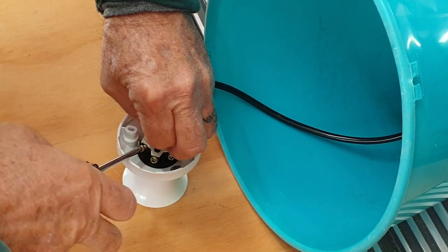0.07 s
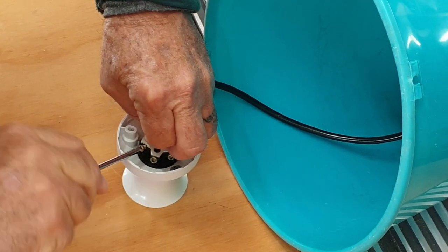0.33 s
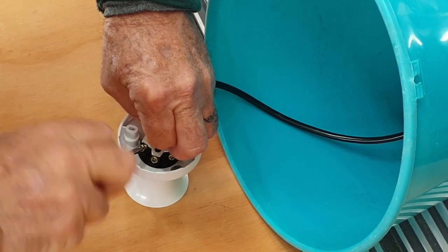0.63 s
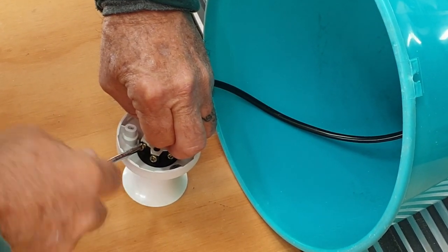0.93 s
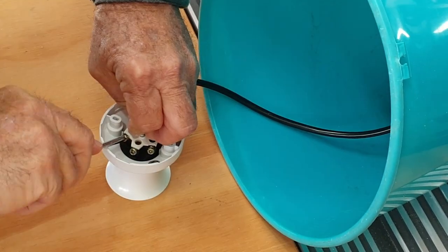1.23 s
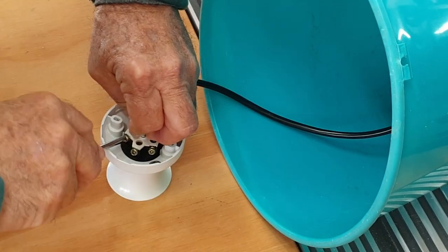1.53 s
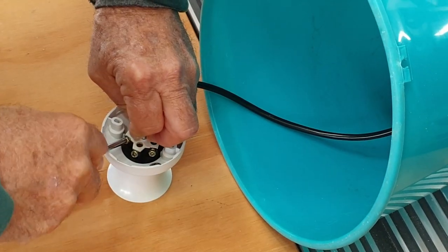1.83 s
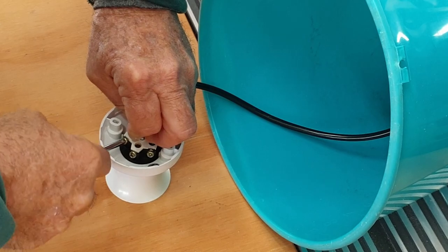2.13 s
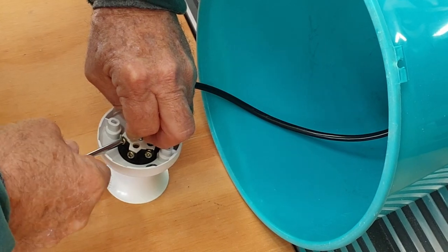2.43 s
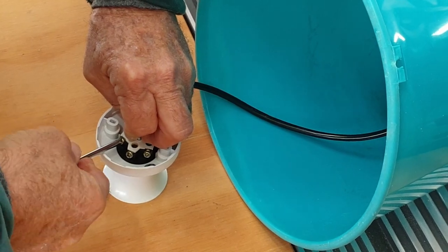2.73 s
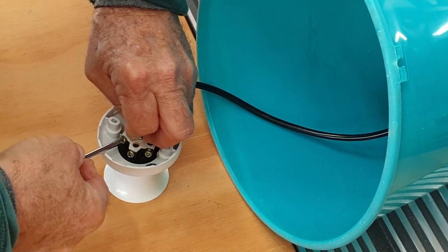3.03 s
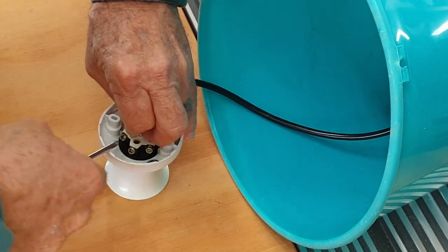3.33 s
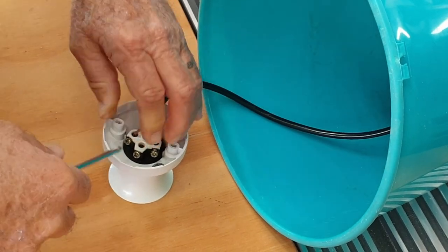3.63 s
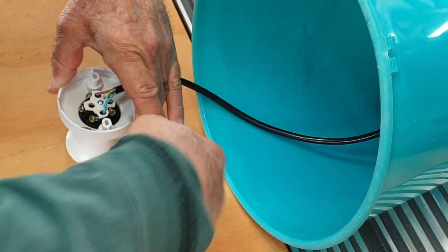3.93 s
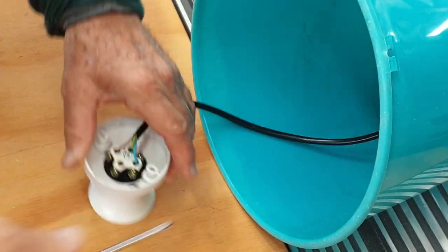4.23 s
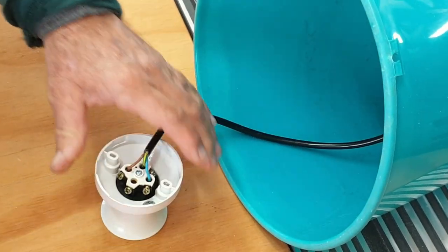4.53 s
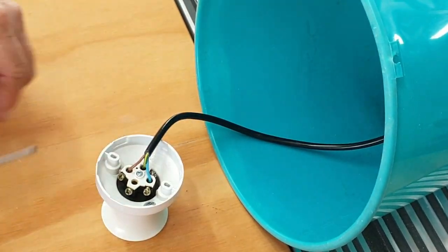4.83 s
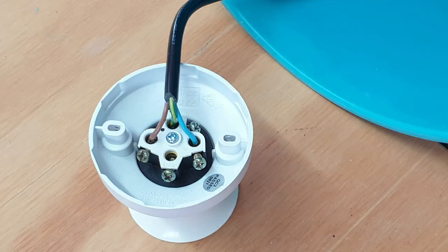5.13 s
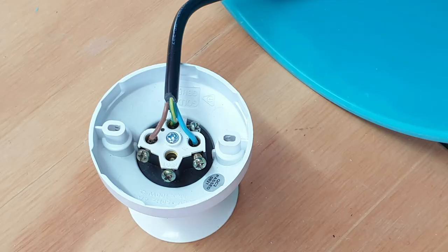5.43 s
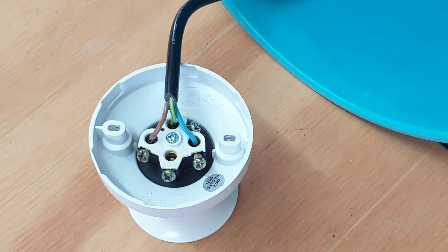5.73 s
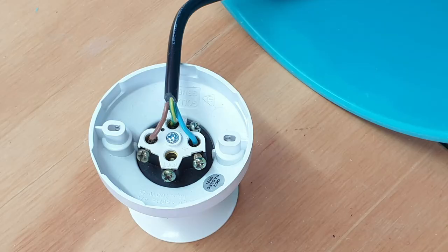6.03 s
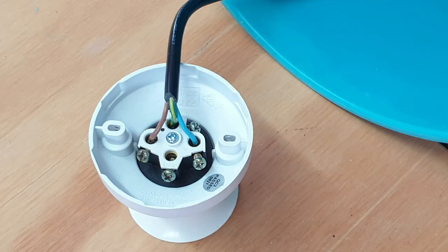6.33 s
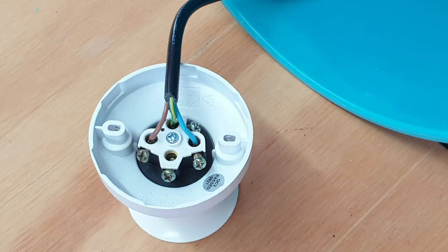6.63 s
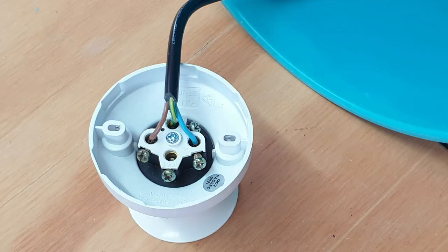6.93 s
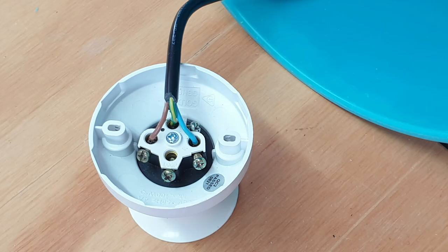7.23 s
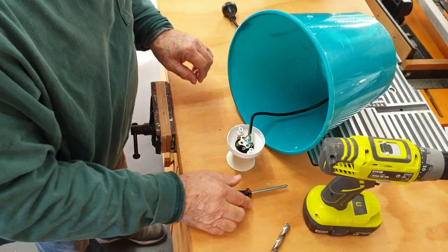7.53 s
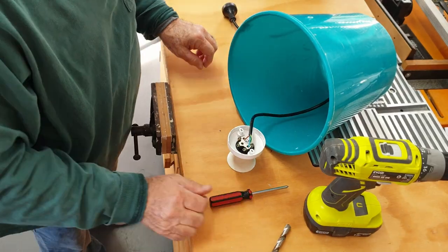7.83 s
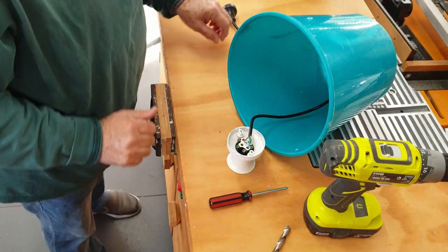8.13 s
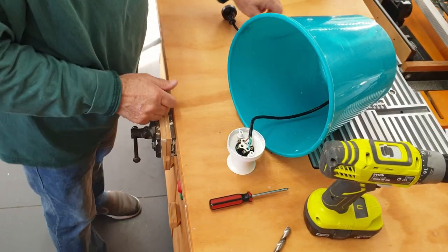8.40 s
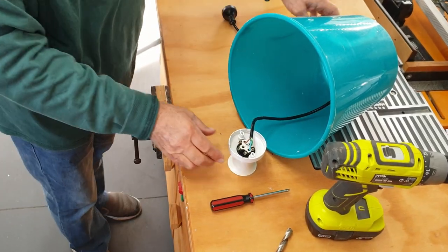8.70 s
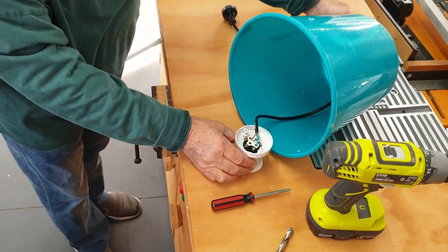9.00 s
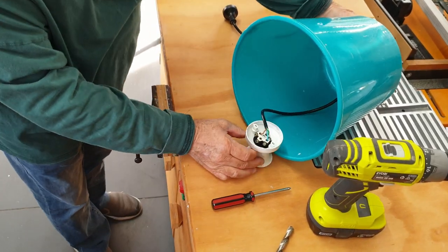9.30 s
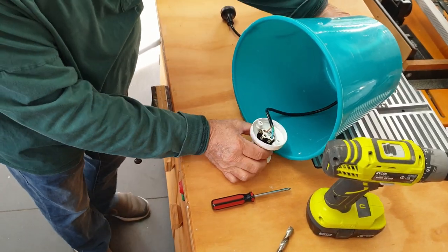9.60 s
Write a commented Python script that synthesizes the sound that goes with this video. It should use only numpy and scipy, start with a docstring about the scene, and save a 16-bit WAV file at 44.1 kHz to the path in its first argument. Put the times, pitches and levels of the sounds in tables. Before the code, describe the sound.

Close, sparse handling sounds in a small, quiet workshop: a steel screwdriver tip taps in a plastic fitting, with hollow touches from a plastic bucket. The fitting scrapes briefly across the wooden bench, clicks several more times, and is finally knocked down twice with a small rattle. Low room rumble, a soft hiss and very faint birds lie underneath.

```python
"""Screwdriver in a light fitting.

A screwdriver works in a plastic fitting on a wooden bench, by a plastic bucket; the fitting is slid
about and knocked down. Each contact rings bench, bucket, shell and steel tip, favouring the one struck;
harder contacts bring out the small parts. A small workshop echoes, over rumble, hiss and far birds."""
import sys
import numpy as np
from scipy import signal
from scipy.fft import rfft, irfft
from scipy.io import wavfile
from scipy.ndimage import uniform_filter1d

SR = 44100
rng = np.random.default_rng(int(sys.argv[2]) if len(sys.argv) > 2 else 0)


def master_out(mix):
    """Clip the mix to full scale and print it as 16-bit PCM to the path in sys.argv[1]."""
    frames = np.transpose(np.atleast_2d(mix))
    ceiling = np.clip(frames, -1, 1)
    pcm = np.round(ceiling * 32767).astype(np.int16)
    wavfile.write(sys.argv[1], SR, pcm)


N = 426006
TIME_S = np.arange(N) / SR

# room rumble and high hiss, spectra: freq_hz, relative_db
RUMBLE_SPECTRUM = [(20, -18), (40, -16), (60, 1), (90, -1), (150, -6.5), (250, -9), (450, -18),
                   (900, -22.5), (1300, -37.5), (2500, -41), (4500, -46), (9000, -53.5), (13000, -45),
                   (16000, -51.5)]
HISS_SPECTRUM = [(1000, 7), (2000, -4), (3400, -1), (4050, 2.5), (4500, -2), (5300, 1.5), (6700, -8),
                 (7800, -5), (9500, -14.5), (15000, -17)]
# room rumble and high hiss, envelopes: time_s, level_db
RUMBLE_ENVELOPE = [(0, -51.5), (.7, -50.5), (1.6, -53.5), (4.7, -52.5), (6.6, -52), (8.3, -54),
                   (9.66, -50.5)]
HISS_ENVELOPE = [(0, -75), (1.5, -68), (2.9, -69.5), (5.0, -62), (5.3, -75), (7.5, -74), (8.2, -81.5),
                 (9.66, -77)]
# far bird notes: start_s, length_s, pitch_hz, relative_db
BIRD_NOTES = [(.15, .09, 7260, -81), (2.88, 0.2, 3070, -77), (5.131, 0.048, 5350, -63.5),
              (5.67, .06, 5510, -67), (5.987, 0.056, 5550, -72.5), (6.302, 0.33, 9500, -70.5),
              (6.477, .11, 5090, -65), (6.498, 0.14, 7820, -66), (6.56, 0.074, 2480, -69),
              (6.884, .06, 1960, -75), (6.96, 0.283, 2348, -63.5), (7.723, .06, 2586, -79),
              (8.106, 0.062, 2650, -72), (9.43, .06, 2686, -78.5)]
# bench top and air in the bucket: freq_hz, relative_db, t60_s
BENCH_MODES = [(70, -61, 0.38), (89.7, -19.5, 0.2), (127, -16.5, 0.21), (204.4, -1.5, 0.2),
               (235.2, 3.5, 0.068), (281.2, -3.5, 0.2), (336.4, -0.5, 0.16), (358.7, 0.5, 0.15),
               (435.7, -4.5, 0.22), (480.8, 1.5, 0.14), (506, -10, 0.1)]
# bucket wall: freq_hz, relative_db, t60_s
BUCKET_MODES = [(549, -5.5, 0.068), (658, -8.5, 0.23), (705.4, 6.5, 0.083), (799, -1.5, 0.14),
                (874, 0, 0.095), (912.6, 5.5, 0.067), (960, -6, 0.034), (1084.5, -7, 0.12),
                (1138, -20, 0.11), (1153, -10, 0.069)]
# fitting's shell: freq_hz, relative_db, t60_s
SHELL_MODES = [(1468, 4.5, 0.031), (1540, -6, 0.017), (1683, 3, 0.017), (1799, -5.5, 0.13),
               (1876, 7.5, 0.015), (2040, -7.5, 0.052), (2090, -12.5, 0.015), (2470, -8.5, 0.058),
               (2586, -8.5, 0.13), (2648, 4.5, 0.051), (2850, 7, 0.022)]
# steel blade and terminals: freq_hz, relative_db, t60_s
TIP_MODES = [(3540, 5.5, 0.0061), (3985, 4.5, 0.0096), (4460, 4.5, 0.0053), (5080, 2.5, 0.012),
             (5580, -0.5, 0.0082), (5940, 0.5, 0.005), (7300, -1, 0.0069), (7940, -3.5, 0.015),
             (8500, -16, 0.012), (9400, -12, 0.0092), (11000, -33, .005), (11050, -22, 0.0029)]
# drags over wood and plastic: start_s, length_s, force_db, hardness_0_to_1
DRAGS = [(1.063, 0.21, -55, 0), (3.302, .12, -45.5, 0.62), (3.425, 0.24, -51.5, 0.67),
         (3.572, 0.14, -48.5, .75), (3.691, 0.074, -51.5, 0.92), (4.064, 0.11, -35, 0.4),
         (4.159, 0.12, -44, 0.74), (4.254, 0.14, -41, 0.59), (5.075, 0.077, -57.5, 0.7),
         (5.342, 0.18, -44.5, 0.53), (5.454, 0.33, -61, 0.79), (7.119, 0.16, -52.5, 0.33),
         (9.576, 0.09, -51, 0.52)]
# taps and knocks: start_s, strength_db, hardness_0_to_1, struck_body
KNOCKS = [(.171, -52.5, 0.06, "shell"), (.2535, -36.5, 0.48, "tip"), (.346, -62, 0.94, "tip"),
          (.448, -57.5, 0.56, "tip"), (.547, -51.5, .42, "bucket"), (.566, -55.5, 0.67, "bucket"),
          (.721, -43, 0.59, "bucket"), (.765, -47, 0.61, "shell"), (3.067, -53.5, 0.2, "bucket"),
          (3.277, -62, .72, "shell"), (3.307, -56, .6, "bench"), (3.317, -54.5, 0.85, "bucket"),
          (3.351, -47, 0.77, "tip"), (3.492, -43, 0, "tip"), (3.623, -44, 0.38, "tip"),
          (3.643, -40, 0.1, "shell"), (3.895, -54, 0.58, "tip"), (4.101, -45.5, 0.1, "bucket"),
          (4.154, -35, 0.04, "shell"), (4.265, -44.5, .2, "bench"), (4.281, -41, 0.6, "bucket"),
          (4.295, -48, 0.87, "bench"), (5.096, -60, .95, "tip"), (5.166, -45, 0.44, "shell"),
          (5.279, -40.5, 0.13, "shell"), (5.289, -56, 0.67, "bucket"), (5.3085, -42.5, 0.76, "bucket"),
          (5.419, -38.5, 0.56, "shell"), (5.451, -53, .8, "shell"), (5.4597, -38.5, 0.92, "shell"),
          (5.556, -47.5, 0.38, "tip"), (5.815, -59, .72, "shell"), (5.844, -51.5, 0.46, "shell"),
          (6.108, -58, 0.77, "shell"), (6.2907, -43, 0.89, "shell"), (6.4903, -40, 0.83, "shell"),
          (7.132, -62, 1, "bench"), (7.2455, -48.5, 0.67, "shell"), (8.928, -43.5, 0.67, "bucket"),
          (8.9355, -22, 0.34, "shell"), (8.9425, -37.5, 0.8, "bucket"), (8.945, -41, 0.72, "tip"),
          (8.9736, -37.5, 0.79, "tip"), (8.983, -43, 0.63, "tip"), (9.112, -46.5, 0.3, "bench"),
          (9.121, -26.5, 0.26, "shell"), (9.524, -44.5, 0.12, "bench")]


def undb(db):
    """Decibels to gain."""
    return 10 ** (np.asarray(db) / 20)


def unit(x):
    """Scale to rms 1."""
    return x / np.sqrt(np.mean(x ** 2))


def colour(x, spectrum):
    """Filter by (freq_hz, gain_db) points."""
    hz, db = np.transpose(spectrum)
    bins_hz = np.fft.rfftfreq(x.shape[-1], 1 / SR)
    gain = undb(np.interp(np.log(bins_hz + 1), np.log(hz), db))
    return irfft(rfft(x) * gain, x.shape[-1])


def band(x, lo_hz, hi_hz):
    """Causal band-pass."""
    edges_hz = [lo_hz, min(hi_hz, SR / 2 - 1000)]
    return signal.sosfilt(signal.butter(3, edges_hz, "band", fs=SR, output="sos"), x)


def diffuse(size, apart_hz=1100):
    """Stereo noise from all round: coherent in the bass, unrelated in the treble."""
    mid, side = rfft(rng.standard_normal((2, size)))
    coherence = .985 / (1 + (np.fft.rfftfreq(size, 1 / SR) / apart_hz) ** 2)
    mid *= np.sqrt((1 + coherence) / 2)
    side *= np.sqrt((1 - coherence) / 2)
    return irfft([mid + side, mid - side], size)


def fade(t, t60_s):
    """Exponential decay."""
    return np.exp(-np.log(1000) * t / t60_s)


def walk(rate_hz):
    """Smooth random wander, rms 1."""
    hold = int(SR / rate_hz)
    steps = np.repeat(rng.standard_normal(N // hold + 1), hold)
    return unit(uniform_filter1d(steps, hold)[:N])


def convolve(x, response):
    """Apply a stereo impulse response."""
    return signal.fftconvolve(np.atleast_2d(x), response, axes=1)[:, :N]


def add(out, x, start_s):
    """Mix x into out."""
    i = int(start_s * SR)
    out[:, i:i + x.shape[1]] += x[:, :N - i]


def pan(x, left_db):
    """Raise left over right by left_db."""
    return x * undb(np.array([[left_db], [-left_db]]) / 2)


def background(waver_db=1.53, waver_below_hz=1200):
    """Room rumble with a wavering low end; hiss that rises over the first seconds, then drops sharply just
    after 5 s and again near 8 s."""
    room = unit(colour(diffuse(N, apart_hz=685), RUMBLE_SPECTRUM))
    room *= undb(np.interp(TIME_S, *np.transpose(RUMBLE_ENVELOPE)))
    low = colour(room, [(waver_below_hz, 0), (2 * waver_below_hz, -20)])
    rumble = room - low + low * undb(waver_db * walk(rate_hz=4))
    hiss = unit(colour(diffuse(N), HISS_SPECTRUM))
    hiss *= undb(np.interp(TIME_S, *np.transpose(HISS_ENVELOPE)))
    return pan(rumble, left_db=3) + hiss


def birds(flutter_depth_hz=115, bend_ratio=.018, throb_db=4.5, gain_db=1.5, direct_db=-5):
    """Thin whistles that bend at random, flutter and arrive mostly as echo."""
    song = np.zeros((1, N))
    flutter_hz = flutter_depth_hz * walk(rate_hz=400)
    bend = bend_ratio * walk(rate_hz=30)
    throb = undb(gain_db + throb_db * walk(rate_hz=110))
    for start_s, length_s, pitch_hz, relative_db in BIRD_NOTES:
        i, n = int(start_s * SR), int(length_s * SR)
        hz = pitch_hz * (1 + bend[i:i + n]) + flutter_hz[i:i + n]
        envelope = undb(relative_db) * signal.windows.tukey(n, .3) * throb[i:i + n]
        note = envelope * np.sin(2 * np.pi * np.cumsum(hz) / SR)
        add(song, note[None], start_s)
    t = np.arange(SR) / SR
    echo = unit(diffuse(len(t)) * fade(t, t60_s=.4)) / np.sqrt(len(t))
    echo[:, 0] += undb(direct_db)
    return convolve(song, echo)


def workshop(wet_db, scatter_db=-5, near_s=.0036, wall_s=.0235, wall_db=-13, build_s=.0095):
    """Room response: direct path, echo and scatter off things on the bench, wall echo, short tail."""
    t = np.arange(SR // 2) / SR
    noise = diffuse(len(t))
    low = signal.sosfilt(signal.butter(2, 2000, fs=SR, output="sos"), noise) * fade(t, t60_s=.37)
    high = band(noise, 2300, 22400) * fade(t, t60_s=.35)
    tail = (low + high) * np.minimum(t / build_s, 1)
    scatter = diffuse(len(t)) * fade(t, t60_s=.083) * (t > .002)
    response = undb(wet_db) * (unit(tail) + undb(scatter_db) * unit(scatter)) / np.sqrt(len(t))
    response[:, 0] += 1
    response[:, int(near_s * SR)] += undb(wet_db / 2 - 7)
    response[:, int(wall_s * SR)] += undb(wall_db)
    return response


def ring(modes, crack_db, crack_t60_s, rise_s, tilt_db_per_oct, spot_db=1.87, detune_ratio=.0037):
    """One blow on a body: the spot struck weights its modes; many dead modes make a brief crack."""
    t = np.arange(SR // 4) / SR
    hz, db, t60_s = np.transpose(modes)[:, :, None]
    lowest_hz, highest_hz = hz[0, 0], hz[-1, 0]
    weight, shift, turn = rng.standard_normal((3, len(hz), 1))
    gain = undb(db + spot_db * weight + tilt_db_per_oct * np.log2(hz))
    waves = gain * fade(t, t60_s) * np.exp(2j * np.pi * hz * (1 + detune_ratio * shift) * t)
    # left is nearer; high modes reach the two sides out of step
    lead_rad = .58 * np.tanh(hz / 700) + turn * hz / 7000
    tone = np.array([(waves * np.exp(1j * side * lead_rad)).imag.sum(0) for side in (1, -1)])
    rise = 1 - np.exp(-t / rise_s)  # big, soft parts start slowly
    tone = band(tone * rise, lowest_hz * .87, highest_hz * 1.04)
    burst = diffuse(len(t), apart_hz=1940) * fade(t, crack_t60_s) * rise
    crack = band(burst, lowest_hz, highest_hz)
    return unit(tone) + undb(crack_db) * unit(crack)


def friction(soft_db, hard_db, slip_db=2, catch_db=1.5, peak_fraction=.44, edge_db=-12.5):
    """Dense, uneven slips and slower catches under a force that swells and lets go."""
    force = np.zeros(N)
    for start_s, length_s, force_db, hardness in DRAGS:
        progress = (TIME_S - start_s) / length_s
        swell_db = np.interp(progress, [0, peak_fraction, 1], [edge_db, 0, edge_db])
        share_db = np.interp(hardness, [0, 1], [soft_db, hard_db])
        force += undb(force_db + share_db + swell_db) * (progress > 0) * (progress < 1)
    roughness_db = slip_db * walk(rate_hz=250) + catch_db * walk(rate_hz=50)
    return force * unit(undb(roughness_db))


def rub(modes, soft_db, hard_db, rasp_db, tilt_db_per_oct):
    """All drags on one body: friction sustains its modes and adds a broad rasp."""
    force = friction(soft_db, hard_db)
    body = ring(modes, crack_db=-7.5, crack_t60_s=.0096, rise_s=.00016,
                tilt_db_per_oct=tilt_db_per_oct, spot_db=5.5)
    body /= np.sqrt(np.sum(body ** 2) / 2)
    tone = convolve(force * rng.standard_normal(N), body)
    rasp = force * unit(band(diffuse(N), modes[0][0], modes[-1][0] * 1.17))
    return convolve(tone + undb(rasp_db) * rasp, workshop(wet_db=-7.5))


def strike(body, modes, soft_db, hard_db, struck_db, crack_db, crack_t60_s, rise_s, wet_db,
           darken_per_oct=0, heavy_above_db=-42):
    """All knocks on one body: its share follows hardness, plus struck_db when hit directly."""
    # six random versions of the echo, used in turn so no one colouring dominates
    rooms = [workshop(wet_db) for _ in range(6)]
    blows = np.zeros((2, N))
    for k, (start_s, strength_db, hardness, struck_body) in enumerate(KNOCKS):
        share_db = np.interp(hardness, [0, 1], [soft_db, hard_db])
        level_db = strength_db + share_db + struck_db * (struck_body == body)
        # a heavy blow pushes longer and favours the low modes
        tilt_db_per_oct = -darken_per_oct * max(level_db - heavy_above_db, 0)
        ringing = ring(modes, crack_db, crack_t60_s, rise_s, tilt_db_per_oct)
        blow = convolve(ringing, rooms[k % len(rooms)])
        attack_rms = np.sqrt(np.mean(blow[:, :SR // 50] ** 2))
        add(blows, blow / attack_rms * undb(level_db), start_s)
    return blows


def scene():
    """Four bodies, struck and rubbed, over birds and background."""
    bench = strike("bench", BENCH_MODES, soft_db=.5, hard_db=-.2, struck_db=11.5,
                   crack_db=-6.5, crack_t60_s=.1, rise_s=.0028, wet_db=-11.5, darken_per_oct=.55)
    bench += rub(BENCH_MODES, soft_db=2, hard_db=-4.5, rasp_db=-19, tilt_db_per_oct=1)
    bucket = strike("bucket", BUCKET_MODES, soft_db=-11, hard_db=-3.5, struck_db=7.5,
                    crack_db=-5.5, crack_t60_s=.12, rise_s=.0011, wet_db=-6)
    bucket += rub(BUCKET_MODES, soft_db=-11, hard_db=-14, rasp_db=-2.5, tilt_db_per_oct=5)
    shell = strike("shell", SHELL_MODES, soft_db=-30.5, hard_db=1.8, struck_db=1.3,
                   crack_db=-2.5, crack_t60_s=.012, rise_s=.000067, wet_db=-3.5)
    shell += rub(SHELL_MODES, soft_db=-25, hard_db=-10.5, rasp_db=-1, tilt_db_per_oct=11)
    tip = strike("tip", TIP_MODES, soft_db=-41.5, hard_db=-9, struck_db=13,
                 crack_db=-8.5, crack_t60_s=.026, rise_s=.000084, wet_db=-1)
    tip += rub(TIP_MODES, soft_db=-32.5, hard_db=-11, rasp_db=5.5, tilt_db_per_oct=5)
    large_parts = pan(bench, left_db=2) + pan(bucket, left_db=2.5)
    small_parts = pan(shell, left_db=4) + pan(tip, left_db=-1.3)
    return large_parts + small_parts + birds() + background()


def record(dry):
    """Steep low-pass at 15.75 kHz."""
    return signal.sosfilt(signal.ellip(10, .2, 70, 15750, fs=SR, output="sos"), dry)


dry = scene()
out = record(dry)
master_out(out)
```